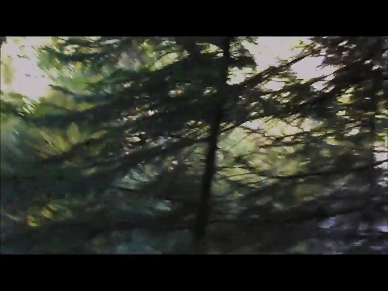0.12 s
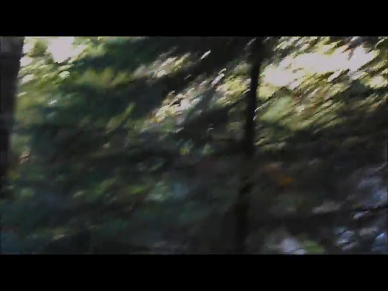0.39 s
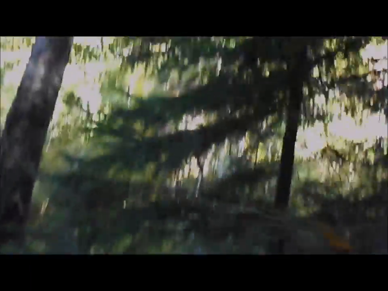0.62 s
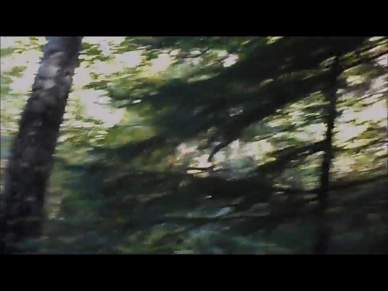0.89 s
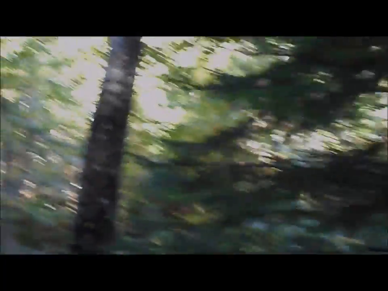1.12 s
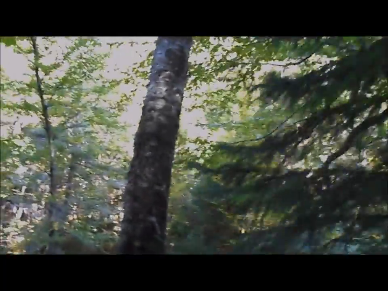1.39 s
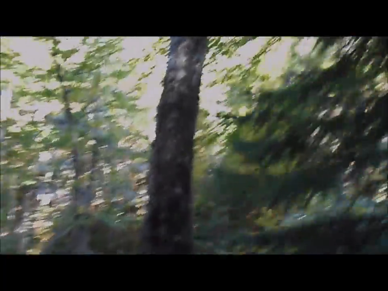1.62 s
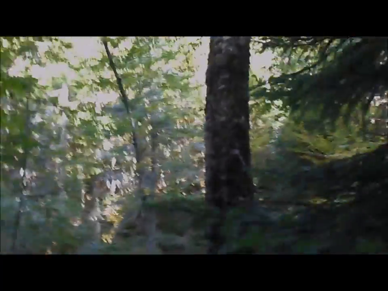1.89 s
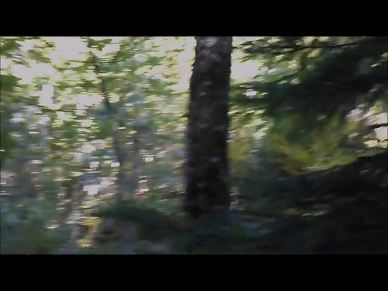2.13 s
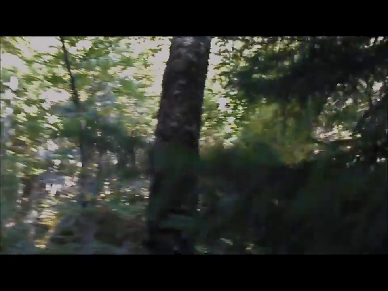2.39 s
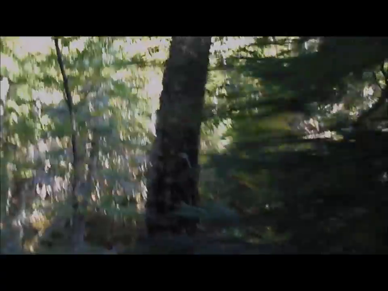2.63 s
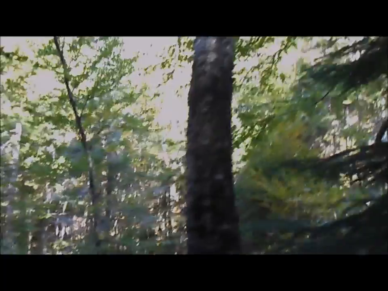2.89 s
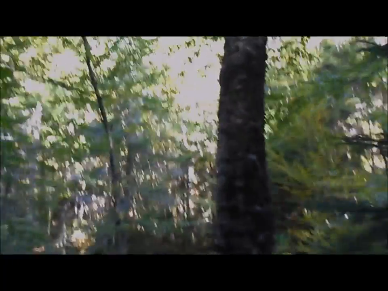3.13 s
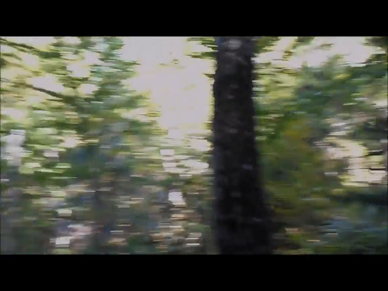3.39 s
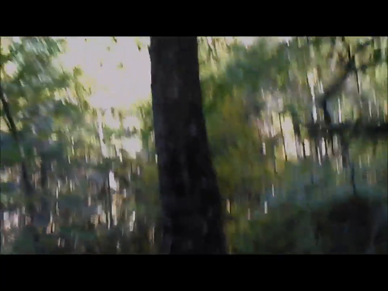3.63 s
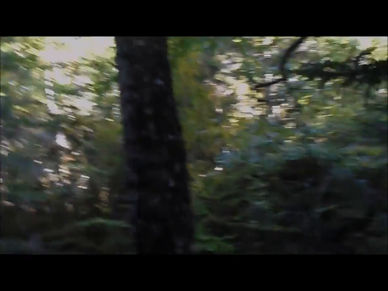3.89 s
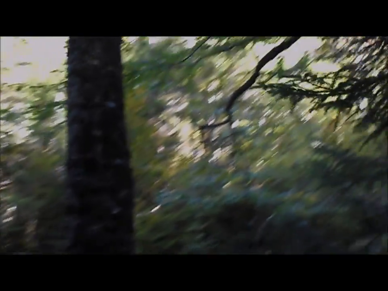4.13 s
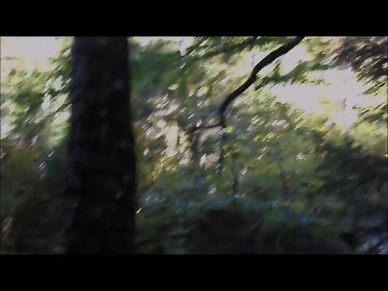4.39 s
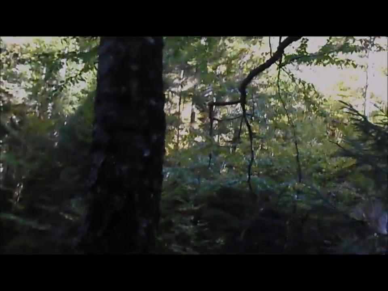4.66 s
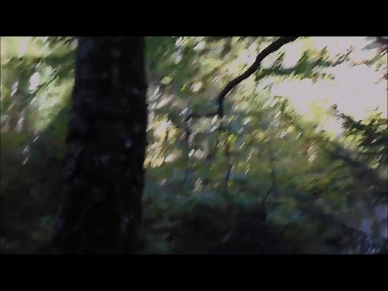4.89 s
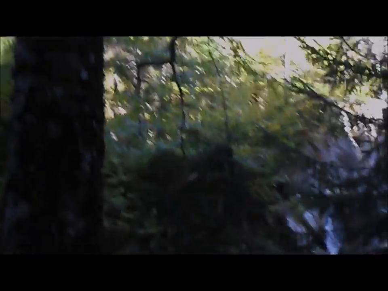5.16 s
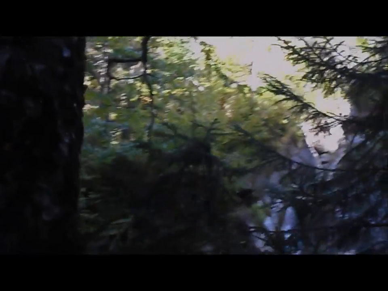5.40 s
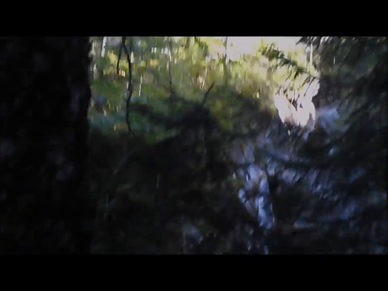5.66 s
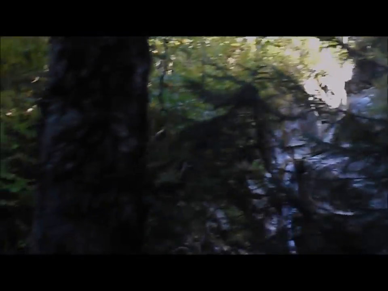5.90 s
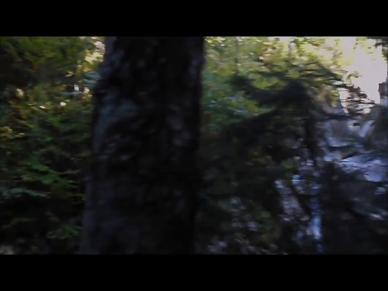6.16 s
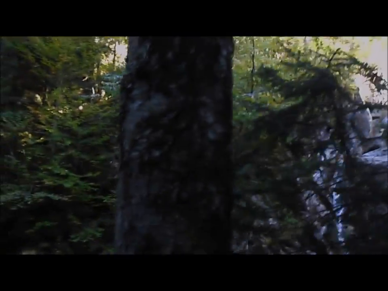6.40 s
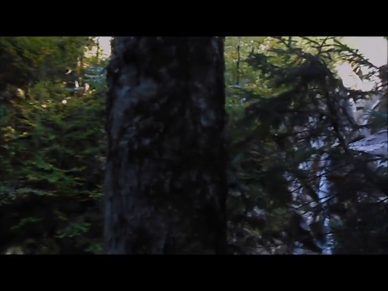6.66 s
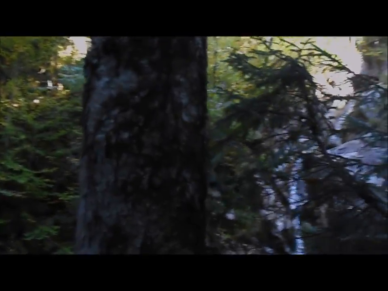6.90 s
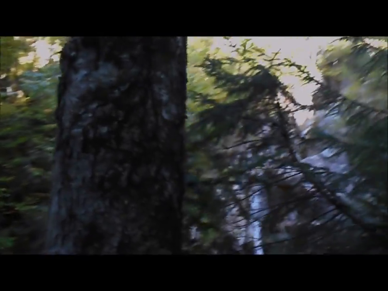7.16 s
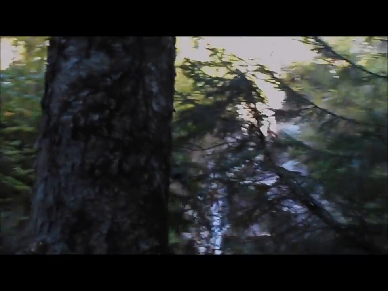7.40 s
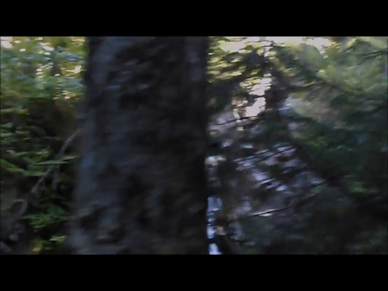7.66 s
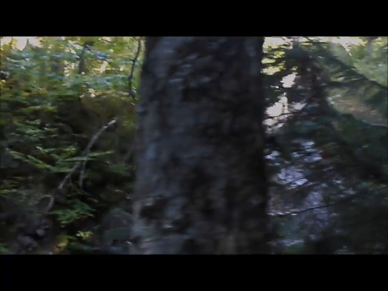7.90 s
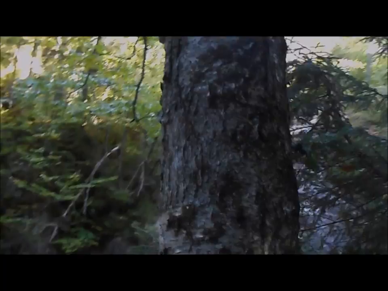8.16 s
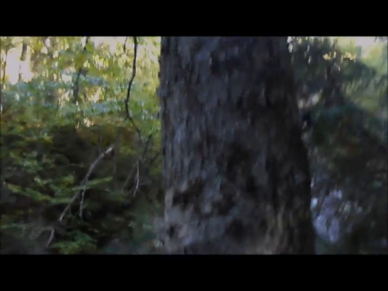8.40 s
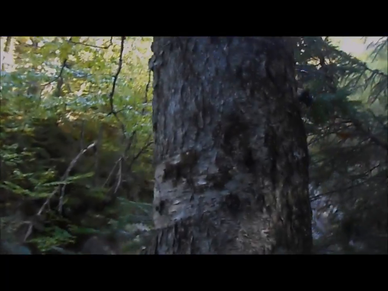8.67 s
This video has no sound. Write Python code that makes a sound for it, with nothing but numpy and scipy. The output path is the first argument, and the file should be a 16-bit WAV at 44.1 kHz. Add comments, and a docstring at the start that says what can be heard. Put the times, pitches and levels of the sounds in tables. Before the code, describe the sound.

From 0 to about 8.8 seconds a waterfall rushes continuously in a forest: dense spray hiss strongest between roughly 2 and 6 kHz, with fine bubbling inside it, weak bass and nothing above about 11 kHz. The hand-held mono microphone moves, so short reflections make the colour drift and hollow slightly. The level rises a little and brightens by 0.9 seconds, then stays almost even with quick random flutter. Faint dull bumps of the grip come near 0.2, 1.8 and 5.5 seconds, the pair at 1.8 clearest. Tiny dips occur around 3.1, 3.7, 5.3 and 5.95. From 0.6 to 8.3 seconds, scattered instants of about 20 to 40 milliseconds thin the hiss into watery, warbling tones. Around 6.5 the low body thins. After 7.7 the rush drops about three decibels, and from 8.3 it turns duller until the end.

```python
"""A waterfall heard through trees by a small hand-held mono microphone that is carried along and turned.
Spray noise and ringing bubbles arrive directly and by two short echoes; the housing casts a moving
treble shadow. The level flutters at random and dips briefly at times. Bumps of the grip ring the housing.
Now and then the hiss thins for a moment into a handful of steady tones: its strongest cosines alone stay."""
import sys
import numpy as np
from scipy import signal
from scipy.io import wavfile
from scipy.ndimage import uniform_filter1d

SR = 44100
rng = np.random.default_rng(int(sys.argv[2]) if len(sys.argv) > 2 else 0)


def int16_out(signal):
    """Quantize to a 16-bit WAV file."""
    q = np.round(np.clip(np.atleast_2d(signal).T, -1, 1) * 32767)
    wavfile.write(sys.argv[1], SR, q.astype(np.int16))


def rack_gain(trim_db):
    """Turn a fader trim in dB into the linear factor to multiply a signal by."""
    fader = np.asarray(trim_db, float)
    return 10 ** (fader / 20)


N = 387638


def rms_one(x):
    """Scale to rms 1."""
    return x / np.sqrt(np.mean(x ** 2) + 1e-20)


def columns(rows, s):
    """Interpolate each column of a curve table at the times s."""
    at_s, *rest = np.transpose(rows)
    return [np.interp(s, at_s, column) for column in rest]


def ring(clicks, hz, t60_s):
    """Two-pole resonator: a unit click starts a decaying sine of initial height 1."""
    radius = rack_gain(-60 / (t60_s * SR))
    angle = 2 * np.pi * hz / SR
    return signal.lfilter([0, np.sin(angle)], [1, -2 * radius * np.cos(angle), radius ** 2], clicks + 1e-18)


def patches(hz, s, octaves, seconds):
    """Random field over pitch and time, rms 1, smoothed twice over the given spans."""
    rows_per_octave, rows = 16, 160
    pitch_span = max(1, round(octaves * rows_per_octave))
    time_span = max(1, round(seconds / (s[1] - s[0])))
    field = rng.standard_normal((rows, len(s)))
    for _ in range(2):
        field = uniform_filter1d(field, pitch_span, axis=0)
        field = uniform_filter1d(field, time_span, axis=1)
    row = np.clip(rows_per_octave * np.log2(hz / 20), 0, rows - 1).astype(int)
    return rms_one(field)[row]


def bubbles(per_s=3000, cycles=7.0, spread_db=2.5):
    """Trapped air rings a few cycles (to -60 dB); many sizes, so pitches spread over four octaves."""
    sizes = rack_gain(spread_db * np.minimum(rng.exponential(1, N), 4)) * rng.choice([-1, 1], N)
    born = rng.random(N) < per_s / SR
    dealt = rng.integers(0, 20, N)
    total = np.zeros(N)
    for k, hz in enumerate(np.geomspace(250, 4500, 20)):
        clicks = sizes * born * (dealt == k)
        total += ring(clicks, hz, cycles / hz) * np.sqrt(hz)
    return rms_one(total)


def loudness_db(s):
    """Level as the walker moves, a trunk coming between near the end, with brief dips and random flutter."""
    # Each row: time in seconds, level in dB before dips and flutter.
    walk = [(0, -27.5), (.22, -27), (.9, -25.5), (1.39, -26.5), (1.79, -25.5), (1.9, -27), (3.0, -25.8),
            (4.5, -26), (6.3, -26), (7.22, -26), (7.66, -27), (7.78, -29.5), (8.79, -29)]
    # Each row: centre in seconds, depth in dB.
    dips = [(2.93, 1.5), (3.085, 3), (3.185, 3), (3.67, 2.5), (4.88, 1), (5.29, 1.5), (5.95, 3.5)]
    dip_sigma_s = 0.013
    flutter_rms_db, quickest_s, slowest_s = .65, .025, .16
    level_db, = columns(walk, s)
    for at_s, depth_db in dips:
        level_db = level_db - depth_db * np.exp(-.5 * ((s - at_s) / dip_sigma_s) ** 2)
    swell = rng.standard_normal(len(s))
    for _ in range(2):
        swell = uniform_filter1d(swell, round(quickest_s / s[1]))
    swell = swell - uniform_filter1d(swell, round(slowest_s / s[1]))
    return level_db + flutter_rms_db * rms_one(swell)


def fall_colour_db(hz, s, patchy_db=1.0, slow_db=.5):
    """Spectrum of the fall, with slow band lifts, a low resonance, housing shadow and random patches."""
    # Each row: frequency in Hz, relative spectral density in dB.
    fall = [(15, -70), (25, -40), (80, -41), (271, -25.5), (566, -14.5), (808, -7), (1410, -5.5),
            (2060, -1.5), (2730, -2.5), (3610, 1), (4530, -2.5), (5700, 1), (8330, -9.5), (9950, -19),
            (10700, -42), (14000, -65), (22000, -120)]
    # Each row: time in seconds, lifts of bass, presence and treble in dB.
    turn_lifts = [(0, 3.5, 0, 0), (0.9, 4, 2.5, 3.5), (1.4, 3.5, 1, 2.5), (2.1, 4, -1, 1.5),
                  (3.0, -2, -2, 1.5), (3.5, 3, 1, 4), (4.3, 1.5, -0.5, 1), (5.0, -3, -1.5, -1.5),
                  (5.9, -0.5, -1, 0.5), (6.5, -9.5, -2.5, -2), (7.5, 1.5, 2, 3.5), (7.9, 2, -3, -1.5),
                  (8.3, 1, -3.5, -6.5), (8.79, -2, -4, -7)]
    # Each row: time in seconds, shadow centre in Hz, depth in dB (negative lifts).
    shadow = [(0.1, 6100, 3.5), (0.9, 7040, 5.5), (1.5, 9000, 3.5), (2.0, 10300, -1.5), (2.6, 9200, 3.5),
              (3.5, 10000, 2), (3.95, 9200, 4), (4.2, 7100, 6), (5.0, 6800, 5), (5.6, 5670, 6),
              (6.4, 6750, 6), (7.5, 5340, 4), (8.5, 6400, 2)]
    hum_hz, hum_width_hz, hum_db = 151, 8.9, 2
    bass_db, presence_db, treble_db = columns(turn_lifts, s)
    shadow_hz, shadow_db = columns(shadow, s)
    fall_hz, fall_db = np.transpose(fall)
    colour = np.interp(np.log(hz), np.log(fall_hz), fall_db)
    colour = colour + bass_db / (1 + (hz / 600) ** 2) / (1 + (110 / hz) ** 4)
    colour = colour + presence_db * np.exp(-.5 * (np.log(hz / 2600) / 0.39) ** 2)
    colour = colour + treble_db / (1 + (5000 / hz) ** 4)
    colour = colour + hum_db / (1 + ((hz - hum_hz) / hum_width_hz) ** 2)
    colour = colour - shadow_db * np.exp(-.5 * (np.log(hz / shadow_hz) / 0.16) ** 2)
    # splashes come and go in quick patches, over slower ones
    colour = colour + patchy_db * patches(hz[:, 0], s, octaves=.4, seconds=.04)
    return colour + slow_db * patches(hz[:, 0], s, octaves=.25, seconds=.3)


def echo_gain(hz, s):
    """Comb of the direct path, a short echo off a near surface and a weaker, longer path."""
    # Each row: time in seconds, echo lag in ms, share reflected (0-1).
    echo_path = [(0, 1.38, .18), (.7, 1.31, 0.26), (1.2, 1.4, 0.3), (2.3, 1.12, 0.3), (2.8, 1.38, 0.35),
                 (4.6, 1.4, .35), (5.0, 1.47, 0.15), (5.4, 1.92, .22), (6.2, 2.06, .36), (6.8, 1.9, 0.12),
                 (7.2, 2.0, 0.47), (7.7, 2.2, 0.15), (8.79, 1.95, .22)]
    turn_rad, cut_hz = 2.6, 1600   # phase turn on reflection, top of what is reflected
    later_lag, later_share = 1.7, 0.2   # ratios to the first echo
    lag_ms, share = columns(echo_path, s)
    cycles = hz * lag_ms / 1000
    reflected = np.clip(share, 0, .9) / (1 + (hz / cut_hz) ** 4)
    echo = reflected * np.exp(1j * (turn_rad - 2 * np.pi * cycles))
    later = later_share * reflected * np.exp(-2j * np.pi * later_lag * cycles)
    return np.abs(1 + echo + later)


def waterfall(bubble_db=-11.5):
    """Spray noise plus bubbles, filtered frame by frame; colour and echoes leave the frame level alone."""
    water = rng.standard_normal(N) + rack_gain(bubble_db) * bubbles()
    hz, s, spectrum = signal.stft(water, SR, nperseg=2048, noverlap=1792)
    hz = np.maximum(hz, 20)[:, None]
    gain = rack_gain(fall_colour_db(hz, s)) * echo_gain(hz, s)
    gain = gain / np.sqrt(np.mean(gain ** 2, axis=0))
    gain = gain * rack_gain(loudness_db(s))
    filtered = signal.istft(spectrum * gain, SR, nperseg=2048, noverlap=1792)[1][:N]
    return filtered / np.std(water)


def knocks():
    """Soft bumps of the hand ring the low modes of the housing; the microphone passes little bass."""
    # Each row: time in seconds, click strength in dB before softening and ringing.
    bumps = [(0.182, -48), (1.804, -48), (1.846, -43.5), (5.548, -50)]
    # Each row: mode frequency in Hz, relative level in dB, T60 in seconds.
    grip_modes = [(173, -31, .05), (280, 3, 0.061), (483, 11, 0.065)]
    clicks = np.zeros(N)
    for at_s, strength_db in bumps:
        clicks[round(at_s * SR)] = rack_gain(strength_db)
    soft = signal.lfilter([.12], [1, -.88], clicks)
    body = sum(rack_gain(mode_db) * ring(soft, hz, t60_s) for hz, mode_db, t60_s in grip_modes)
    return signal.sosfilt(signal.butter(3, 140, "high", fs=SR, output="sos"), body)


def thinned(x, follow=0.76):
    """In each listed frame only the strongest cosine components stay, scaled to carry the frame's power."""
    # Each row: time in seconds, length in 21 ms frames.
    thin_moments = [(0.601, 1), (0.836, 1), (0.921, 1), (0.964, 1), (1.369, 2), (1.476, 1), (1.753, 2),
                    (2.201, 1), (2.35, 1), (2.457, 1), (2.628, 1), (2.692, 1), (2.884, 1), (3.118, 2),
                    (3.182, 1), (3.246, 1), (3.566, 1), (3.886, 1), (4.036, 1), (4.078, 1), (4.27, 1),
                    (4.484, 1), (4.548, 1), (4.782, 1), (4.91, 1), (5.188, 1), (5.23, 1), (5.273, 1),
                    (5.465, 2), (5.593, 1), (5.913, 1), (6.041, 1), (6.297, 1), (6.34, 2), (6.617, 2),
                    (6.788, 1), (7.001, 1), (7.3, 2), (7.769, 1), (8.046, 2), (8.281, 1)]
    hop = 941   # samples per frame; the windows span two
    # each moment draws tone count, lowest Hz and highest Hz from these ranges
    least, most = np.transpose([(12, 28), (620, 1300), (6400, 9000)])
    long_highest_hz = 8600   # moments of several frames use this top instead
    n, k = np.arange(2 * hop), np.arange(470)
    hz = (k + .5) * SR / (2 * hop)
    window = np.sin(np.pi * (n + .5) / (2 * hop))
    basis = np.cos(np.pi / hop * np.outer(k + .5, n + .5 + hop / 2)) * window * np.sqrt(2 / hop)
    out = x.copy()
    drawn = least + (most - least) * rng.random((len(thin_moments), 3))
    for (at_s, frames), (tones, low_hz, high_hz) in zip(thin_moments, drawn):
        if frames > 1:
            high_hz = long_highest_hz
        for j in range(frames):
            start = round(at_s * SR) + (j - 1) * hop
            parts = basis @ x[start:start + 2 * hop]
            # ranking against the local height lets weak regions keep a tone now and then
            height = uniform_filter1d(parts ** 2, 41) ** (follow / 2)
            rank = np.abs(parts) / height * (hz > low_hz) * (hz < high_hz)
            strongest = np.argsort(rank)[-int(tones):]
            kept = np.zeros(len(k))
            kept[strongest] = np.sign(parts[strongest]) * height[strongest]
            kept = kept * np.sqrt(np.sum(parts ** 2) / np.sum(kept ** 2))
            out[start:start + 2 * hop] += (kept - parts) @ basis
    return out


def scene():
    """Water and grip at one microphone, heard alike on both sides."""
    return np.tile(waterfall() + knocks(), (2, 1))


def band_limit(x):
    """A steep low-pass at the top of the band."""
    return signal.sosfilt(signal.butter(12, 10890, fs=SR, output="sos"), x)


def record(dry):
    """The mono sound thins at its moments and goes to both sides."""
    mix = np.tile(thinned(dry[0]), (2, 1))
    return band_limit(mix)


dry = scene()
out = record(dry)
int16_out(out)
```